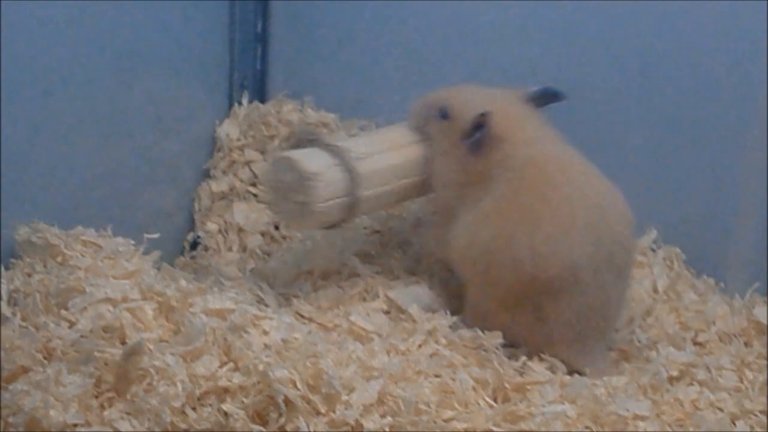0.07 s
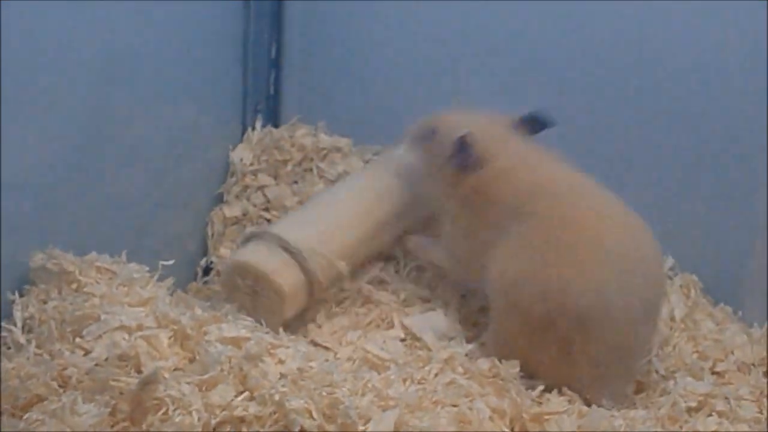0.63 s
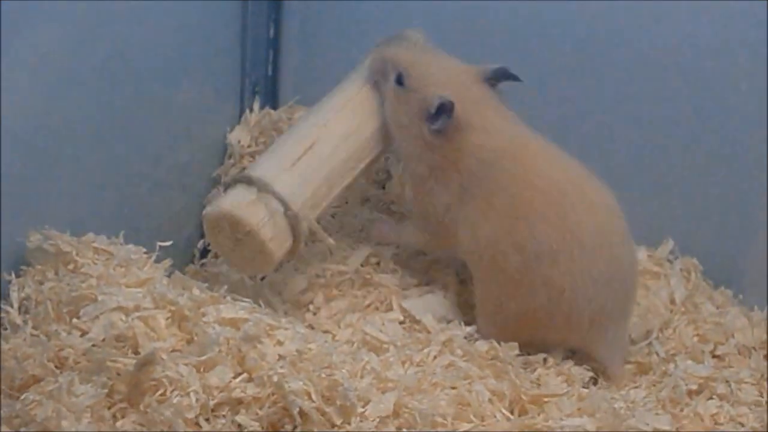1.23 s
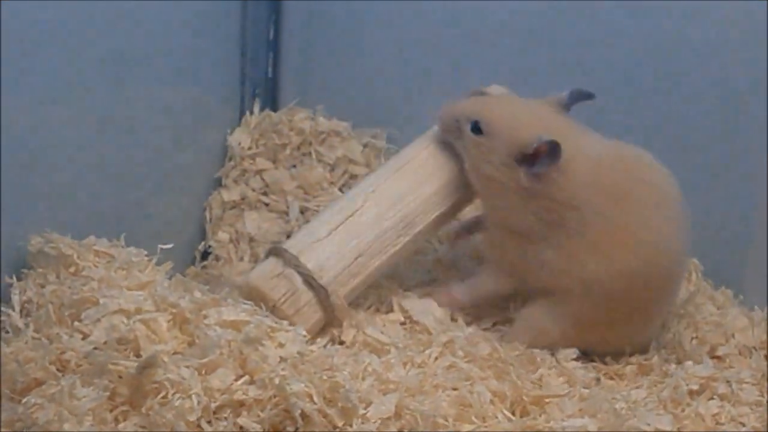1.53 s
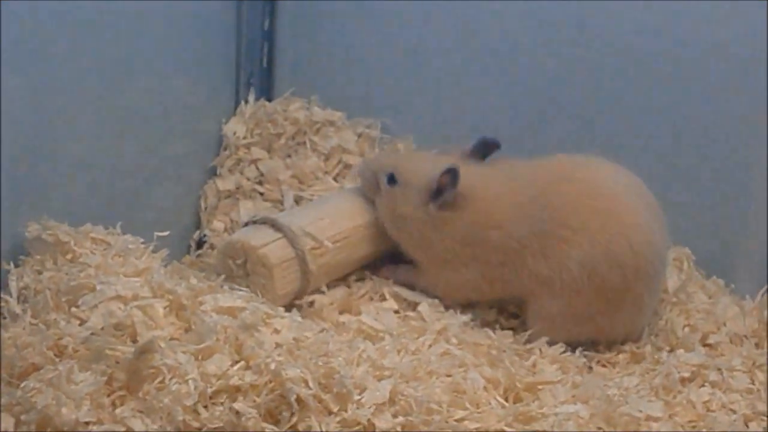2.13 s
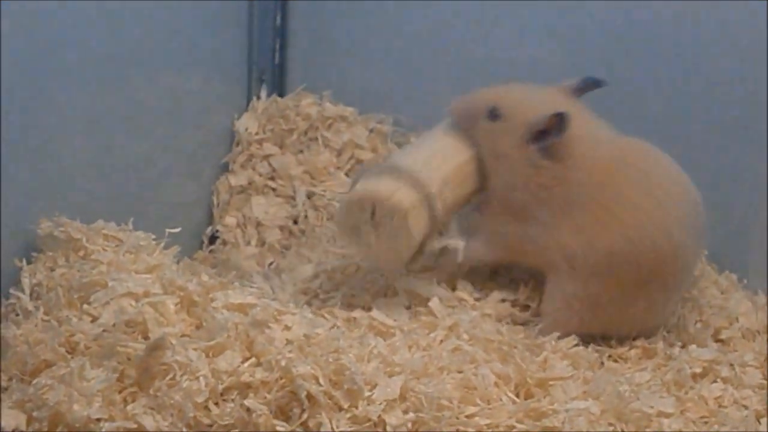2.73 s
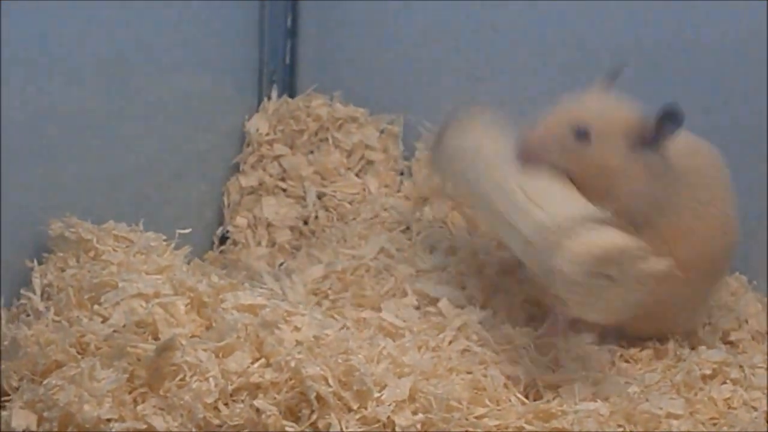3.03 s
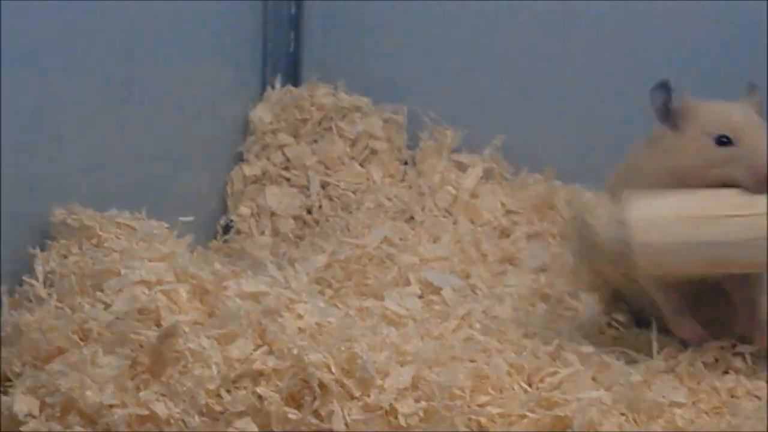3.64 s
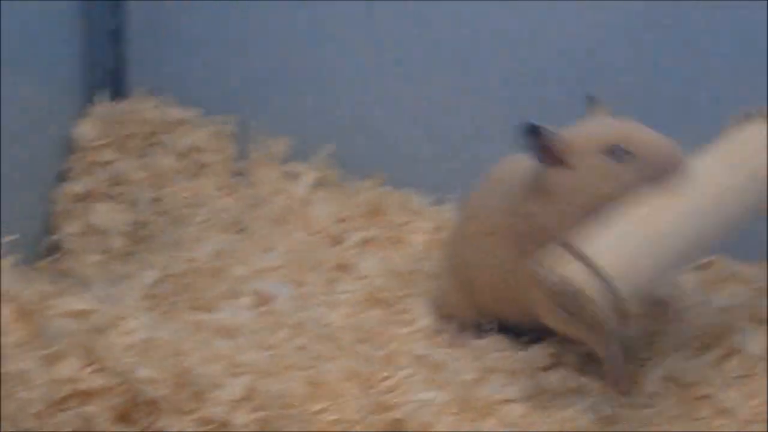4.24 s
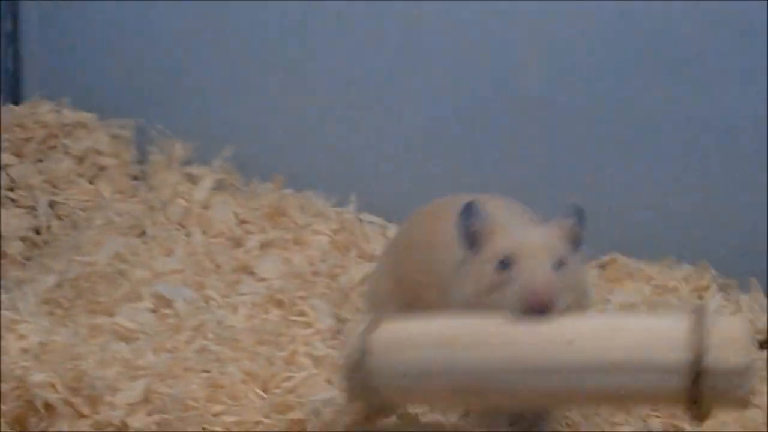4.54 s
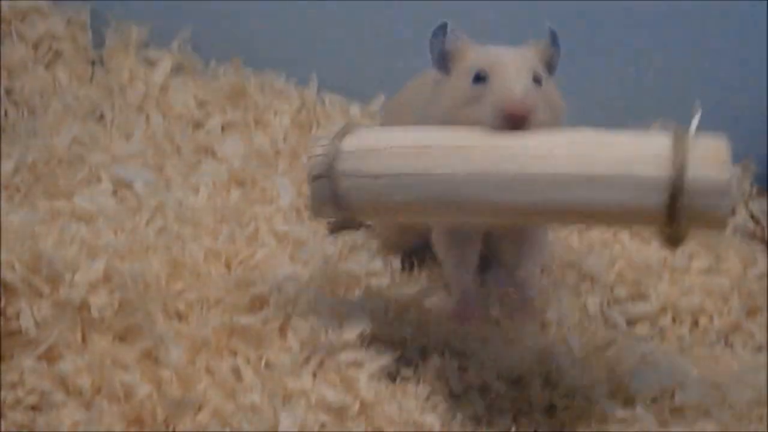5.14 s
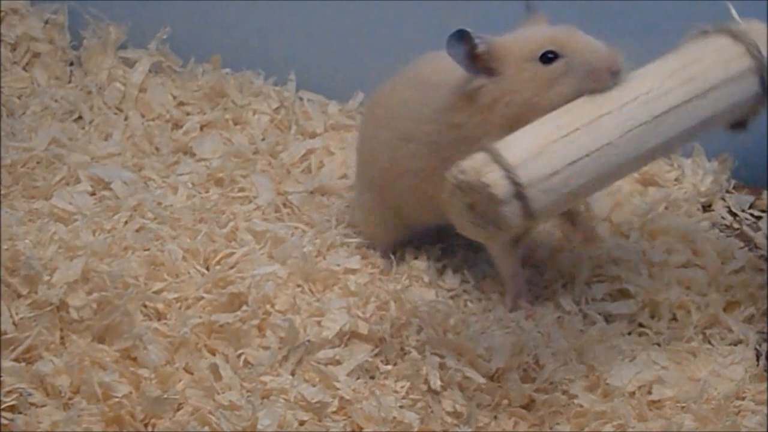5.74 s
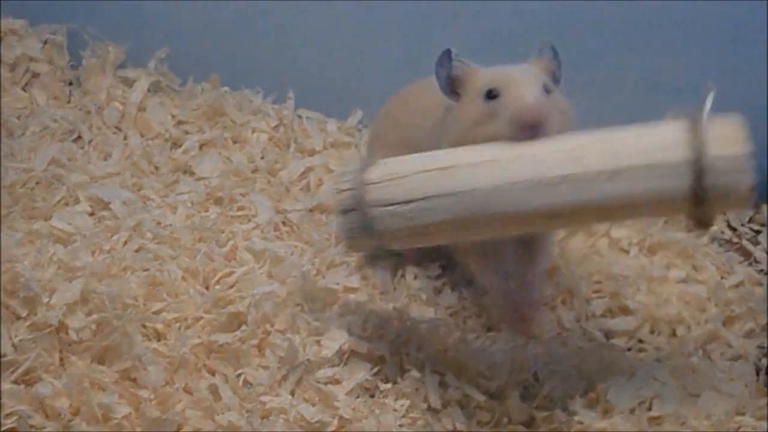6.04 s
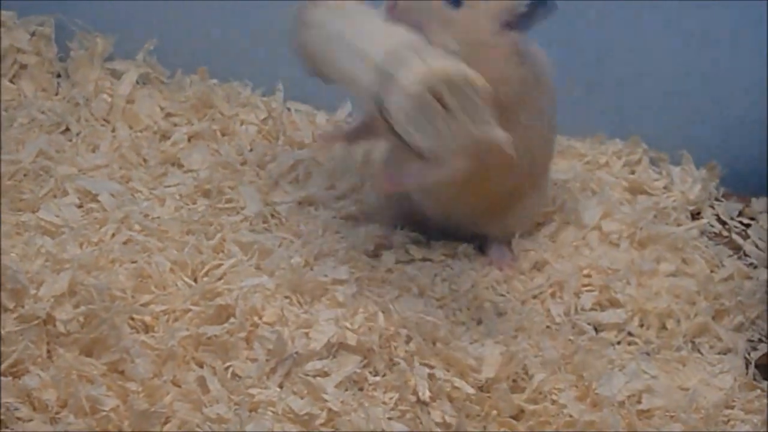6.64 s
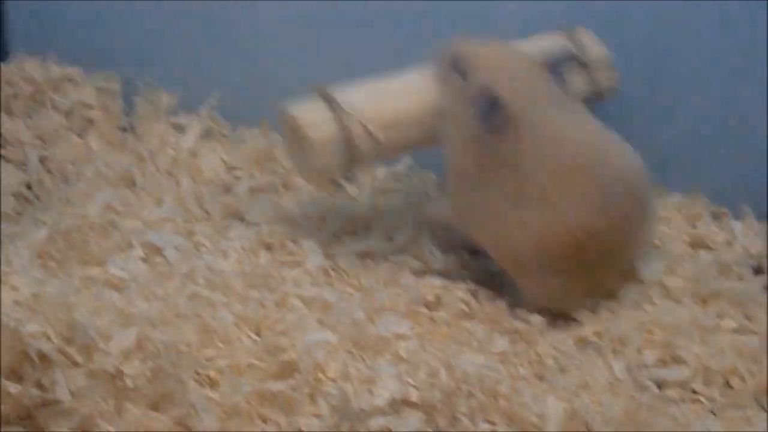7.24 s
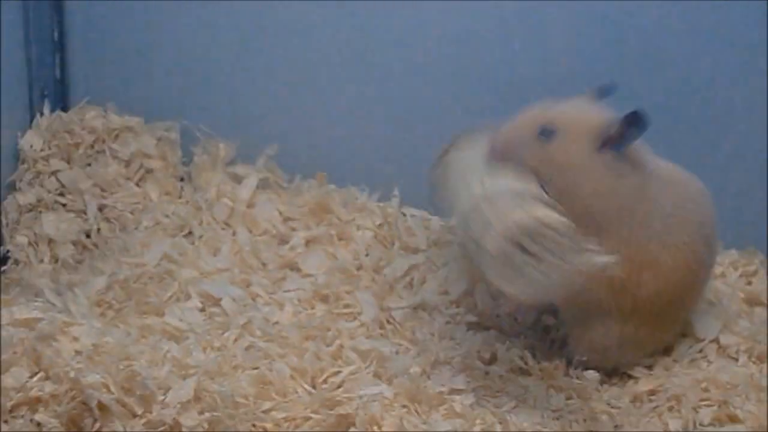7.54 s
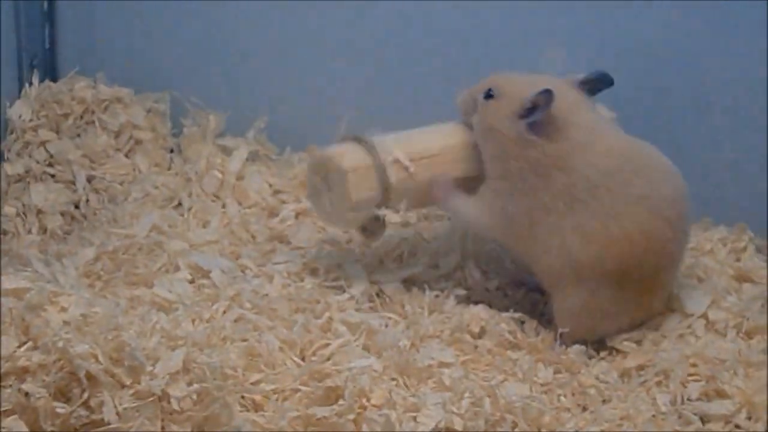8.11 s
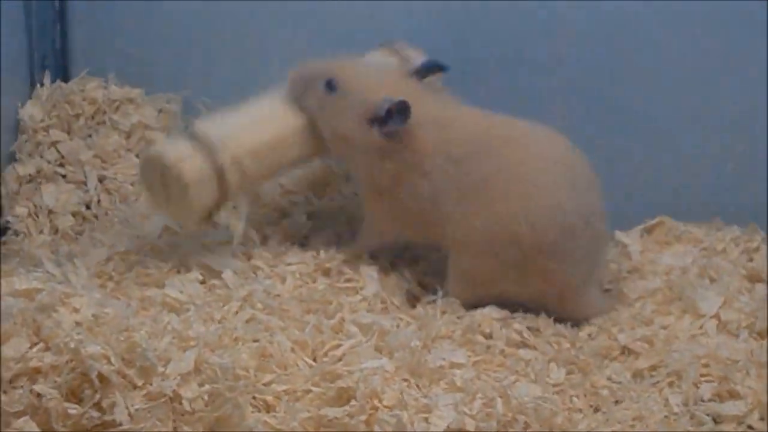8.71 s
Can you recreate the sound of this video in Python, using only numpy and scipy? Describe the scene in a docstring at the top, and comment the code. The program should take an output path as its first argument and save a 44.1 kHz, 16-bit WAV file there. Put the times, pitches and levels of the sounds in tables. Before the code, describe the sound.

A small animal moves a wooden stick, with faint knocks on glass, soft thuds and a few dry snaps over steady hiss.

```python
"""A hamster hauls a wooden stick about on wood shavings in a glass tank, close to a small camera.
The stick knocks the glass into ringing and drops into the bedding with soft thuds. Paws patter,
wood clacks lightly and a few dry snaps sound close by. Under it lie steady hiss, a faint swish
once a second and the thin whine of the camera's electronics."""
import sys
import numpy as np
from scipy import signal
from scipy.fft import rfft, irfft
from scipy.io import wavfile

SR = 44100
rng = np.random.default_rng(int(sys.argv[2]) if len(sys.argv) > 2 else 0)


def transcribe(signal):
    """Save signal, clipped to [-1, 1], as a 16-bit WAV file at the path in sys.argv[1]."""
    frames = np.atleast_2d(signal).T
    limited = np.clip(frames, -1, 1)
    pcm = np.round(limited * 32767).astype(np.int16)
    wavfile.write(sys.argv[1], SR, pcm)


N = 391166

# Noise colours of the hiss, the swish and wood cracking on glass. Each row: pitch in Hz, level in dB.
HISS_COLOUR = [(10, -22), (25, -3), (50, 3.5), (75, -2), (120, -1), (200, -4.5), (350, -6.5), (600, -10),
               (1000, -14.5), (2000, -18), (4000, -21), (7000, -23), (10000, -24.5), (16000, -27)]
SWISH_COLOUR = [(300, -25), (1400, -2.5), (2400, -2), (3400, 0.5), (4300, -5.5), (5500, -3.5), (7500, -13),
                (11500, -14), (16000, -33)]
CRACK_COLOUR = [(500, -10), (900, 2), (1250, -2.5), (1600, -1.5), (2400, -11), (3500, -17), (6000, -23),
                (16000, -43)]
# The fader of the camera's main whine. Each row: time in seconds, level in dB.
WHINE_FADER = [(0, -68.5), (3.9, -73.5), (4.02, -64.5), (4.56, -67.5), (4.7, -63.5), (5.4, -61.5),
               (6, -61.5), (7, -63.5), (8.87, -65.5)]
# Spells of scrambling paws. Each row: start and end in seconds, steps per second, typical peak in dB.
PAW_SPELLS = [(3.941, 4.1, 32, -40.5), (4.101, 5.15, 7, -45.5), (6.2, 7.3, 3.9, -49),
              (8.383, 8.56, 16, -46)]
# Light woody clacks. Each row: start in seconds, level in dB, time to fall 60 dB in seconds.
WOOD_CLACKS = [(0.9251, -39, 0.031), (0.928, -48, 0.19), (1.286, -51, 0.11), (3.828, -38, 0.021)]
# The resonances of a clack. Each row: centre in Hz, width in Hz, level in dB.
CLACK_RESONANCES = [(1030, 510, 3), (1780, 540, 5), (3530, 1100, 1), (4800, 500, 1), (6660, 1200, -1.5),
                    (11000, 3700, -7)]
# Close, dry snaps. Each row: time in seconds, peak in dB.
DRY_SNAPS = [(.2801, -21.5), (3.6969, -27), (3.8209, -22), (3.8281, -8.5), (3.846, -28), (3.8506, -27),
             (3.8804, -19.5), (4.2086, -30), (4.232, -30), (4.4369, -29)]
# Smaller snaps around the loudest. Each row: start and end in seconds, snaps per second,
# typical peak in dB.
CRACKLE_SPELLS = [(3.819, 3.828, 450, -31), (3.96, 4.3, 17, -35.5)]
# The stick landing on the bedding. Each row: time in seconds, peak of the tap in dB,
# its contact time in ms, peak of the shavings giving way in dB.
STICK_DROPS = [(2.089, -40, 0.47, -50), (2.0995, -35.5, .42, -41), (2.461, -41, 0.45, -52),
               (2.4729, -34, 0.39, -37.5), (2.641, -36.5, 0.54, -34), (2.846, -34.5, 0.36, -35.5),
               (3.929, -39.5, .6, -40), (4.325, -50, 1.4, -38), (4.9311, -33.5, 2.1, -40),
               (5.107, -24, .84, -39.5), (6.237, -45, 2.1, -41.5), (6.775, -37.5, .4, -40.5),
               (7.030, -31, 0.69, -43), (7.197, -35.5, 0.27, -40.5)]
# The modes of the glass tank. Each row: pitch in Hz, time to fall 60 dB in seconds, level in dB
# when struck at the end, level in dB when struck at the side, direction of the first swing as +1 or -1.
TANK_MODES = [(92.5, 0.24, -2.5, -3, -1), (121.6, 0.17, 2.5, 0.5, -1), (164, 0.27, -11, -1.5, 1),
              (186.7, 0.15, 9, -3.5, 1), (223, 0.16, -12.5, 4, -1), (247.3, 0.19, -2.5, -11, 1),
              (318, 0.043, -14, 6, 1), (342.4, 0.23, -4.5, -11.5, 1), (379, 0.32, 0.5, -25, -1),
              (413, 0.12, 7, -10, 1), (442, 0.11, 11.5, -18, -1), (480, 0.14, -14, -12.5, -1),
              (543, 0.21, -4, -15.5, 1), (569, 0.18, -4.5, -26, 1), (653, 0.064, 2, -19, -1),
              (722, .12, -11, -20, -1), (823, 0.083, -13, -23, 1)]
# The stick hitting the glass. Each row: start in seconds, level in dB, place from 0 (end) to 1 (side),
# tilt in dB per octave, factor on the ring time (small when the stick stays pressed on).
STICK_KNOCKS = [(0.001, -39, 0.54, -1, 1.4), (0.5194, -39.5, 0.39, 5, 1.3), (2.2354, -33, 0.37, 2, 1.36),
                (2.5018, -44, 0.19, 4, 1.32), (4.013, -48, 0.77, -2.5, 1.14), (4.862, -48.5, 0.98, 5, 0.57),
                (6.961, -47, 0.94, -3.5, 1.4), (7.6645, -36.5, 0.96, 1.1, 1.54),
                (7.9957, -43.5, 0.85, 2.5, 1.45), (8.485, -50.5, 0.33, -0.5, 0.91),
                (8.752, -50.5, 0.6, 4.5, 0.57)]


def gain_of(db):
    """Decibels to gain."""
    return 10 ** (np.asarray(db) / 20)


def unit_rms(x):
    """Scales a sound to rms 1."""
    return x / np.sqrt(np.mean(x ** 2) + 1e-20)


def add(mix, start, sound):
    """Lays a sound into the mix at a start in seconds."""
    part = mix[max(round(start * SR), 0):][:len(sound)]
    part += sound[:len(part)]


def noise(colour, size):
    """Noise of rms 1 with the given colour."""
    points_hz, points_db = np.transpose(colour)
    hz = np.fft.rfftfreq(size, 1 / SR)
    eq = gain_of(np.interp(np.log(hz + 1), np.log(points_hz), points_db))
    return unit_rms(irfft(rfft(rng.standard_normal(size)) * eq, size))


def decay(t, t60):
    """A tail that loses 60 dB in t60 seconds."""
    return np.exp(-np.log(1000) * t / t60)


def scattered(start, end, per_s, db, spread_db=1.5, count=32):
    """Loosely spaced hits of uneven strength. Each row: time in seconds, level in dB."""
    late, softness = rng.random((count, 2)).T
    times = start + (np.arange(count) + late) / per_s
    levels = db - spread_db * (2 * softness - 1)
    return np.column_stack([times, levels])[times < end]


def add_thud(mix, at, db, contact_ms, body_hz, damping=0.63, lead_s=0.02):
    """A short push on a heavily damped body: one swing out and back, no ring."""
    t = np.arange(SR // 8) / SR - lead_s
    push = 1 / (1 + (1000 * t / contact_ms) ** 2)
    w = 1j * np.fft.rfftfreq(len(t), 1 / SR) / body_hz
    swing = irfft(rfft(push) * w ** 2 / (w ** 2 + damping * w + 1))
    add(mix, at - lead_s, gain_of(db) * swing / abs(swing).max())


def hiss(db=-52):
    """A steady bed of noise, heaviest in the lows."""
    return gain_of(db) * noise(HISS_COLOUR, N)


def camera_whine(main_hz=7715.2, frame_hz=29.39, high_hz=11854.4, high_db=-77):
    """The main tone restarts with every picture frame, which gives it a comb of side tones."""
    t = np.arange(N) / SR
    fader = gain_of(np.interp(t, *np.transpose(WHINE_FADER)))
    main = fader * np.sin(2 * np.pi * main_hz * (t % (1 / frame_hz)))
    fade_in = np.clip((t - 6.2) / 0.7, 0, 1)  # a higher tone creeps in late
    high = gain_of(high_db) * fade_in * np.sin(2 * np.pi * high_hz * t)
    return np.sqrt(2) * (main + high)


def swishes(first_s=0.431, every_s=1, db=-56.5, rise_s=0.0011, length_s=0.048):
    """Soft, short puffs of treble noise, as regular as a clock."""
    out, t = np.zeros(N), np.arange(SR // 5) / SR
    envelope = (1 - np.exp(-t / rise_s)) * np.exp(-(t / length_s) ** 2)
    for start in np.arange(first_s, N / SR, every_s):
        add(out, start, gain_of(db) * envelope * noise(SWISH_COLOUR, len(t)))
    return out


def paws():
    """Soft, uneven steps that only press the bedding."""
    out = np.zeros(N)
    for spell in PAW_SPELLS:
        for at, db in scattered(*spell):
            add_thud(out, at, db, contact_ms=1.7, body_hz=88)
    return out


def clacks():
    """Each clack is a quickly dying rattle in a few broad, woody resonances."""
    out, t = np.zeros(N), np.arange(SR // 3) / SR
    hz = np.fft.rfftfreq(len(t), 1 / SR)
    eq = sum(gain_of(db) / (1 + (2 * (hz - centre) / width) ** 2)
             for centre, width, db in CLACK_RESONANCES)
    for start, db, t60 in WOOD_CLACKS:
        rattle = unit_rms(irfft(rfft(rng.standard_normal(len(t))) * eq, len(t)))
        add(out, start, gain_of(db) * rattle * decay(t, t60))
    return out


def snaps(low_cut_hz=520, high_cut_hz=6730, damping=1.2, size=512):
    """Each snap is one bright spike, over in under a millisecond; small ones crackle round the loudest."""
    out, hz = np.zeros(N), np.fft.rfftfreq(size, 1 / SR)
    low, high = 1j * hz / low_cut_hz, 1j * hz / high_cut_hz
    band = low / (1 + low) / (1 + damping * high + high ** 2)
    spike = np.roll(irfft(band), size // 2)
    crackles = [hit for spell in CRACKLE_SPELLS for hit in scattered(*spell)]
    for at, db in [*DRY_SNAPS, *crackles]:
        add(out, at - size / 2 / SR, gain_of(db) * spike / abs(spike).max())
    return out


def stick_thuds(sink_after_s=0.0033):
    """The stick lands with a brief tap, then the shavings give way in a slower, deeper swing."""
    out = np.zeros(N)
    for at, tap_db, contact_ms, sink_db in STICK_DROPS:
        add_thud(out, at, tap_db, contact_ms, body_hz=302)
        add_thud(out, at + sink_after_s, sink_db, contact_ms=2.4, body_hz=69)
    return out


def stick_knocks(rise_s=0.00059, crack_t60=0.068, crack_end_db=-5, crack_side_db=-13.5):
    """Wood cracks on glass and rings the panes; where it lands sets the bite and the mix of modes."""
    out, t = np.zeros(N), np.arange(SR // 2) / SR
    hz, t60, end_db, side_db, direction = np.transpose(TANK_MODES)[:, :, None]
    modes = direction * np.sin(2 * np.pi * hz * t)
    attack = 1 - np.exp(-t / rise_s)
    for start, db, place, tilt, ring_factor in STICK_KNOCKS:
        mode_db = end_db + place * (side_db - end_db) + tilt * np.log2(hz / 250)
        panes = (gain_of(mode_db) * modes * decay(t, t60 * ring_factor)).sum(0)
        crack_db = crack_end_db + place * (crack_side_db - crack_end_db)
        crack = gain_of(crack_db) * noise(CRACK_COLOUR, len(t)) * decay(t, crack_t60)
        add(out, start, gain_of(db) * (panes + crack) * attack)
    return out


def scene():
    """The hamster and its stick over the quiet bed; one microphone feeds both channels."""
    hamster = stick_knocks() + stick_thuds() + paws() + snaps() + clacks()
    mono = hamster + swishes() + camera_whine() + hiss()
    return np.array([mono, mono])


def record(dry):
    """A steep high cut takes off the air above 15.9 kHz."""
    high_cut = signal.firwin(255, 15900, window=("kaiser", 8), fs=SR)
    return signal.oaconvolve(dry, high_cut[None], "same")


dry = scene()
out = record(dry)
transcribe(out)
```